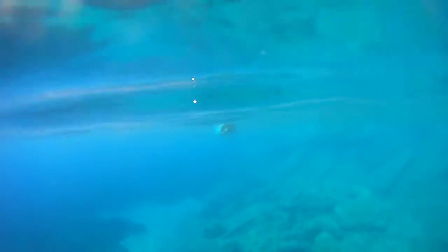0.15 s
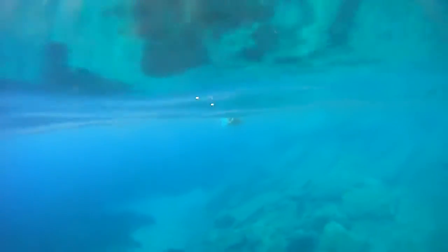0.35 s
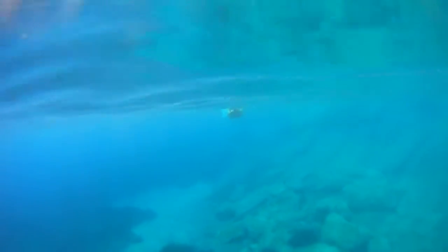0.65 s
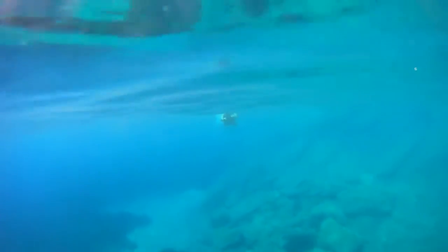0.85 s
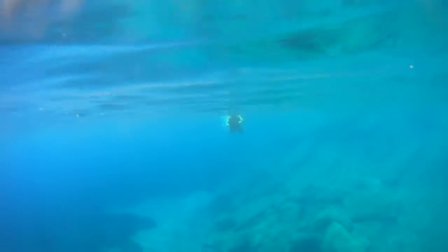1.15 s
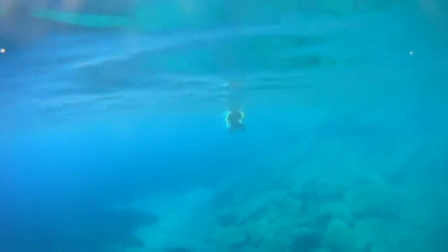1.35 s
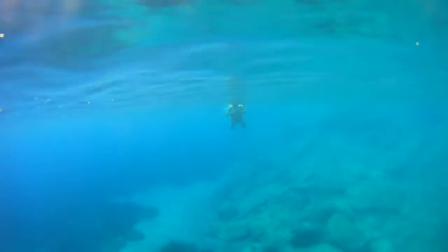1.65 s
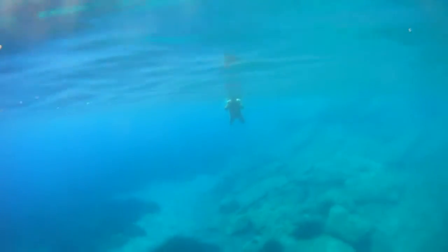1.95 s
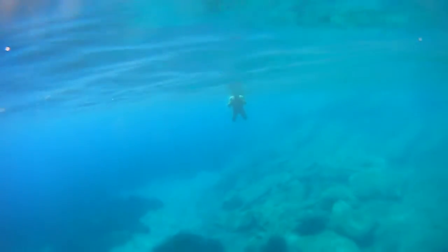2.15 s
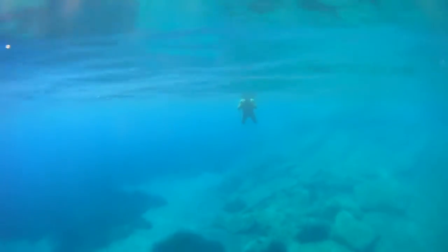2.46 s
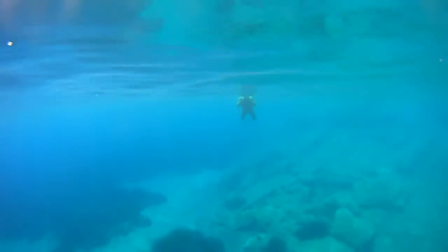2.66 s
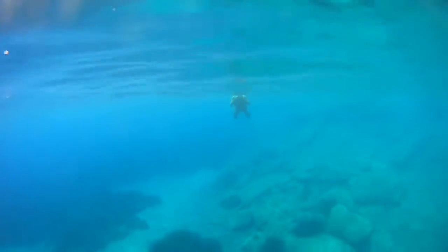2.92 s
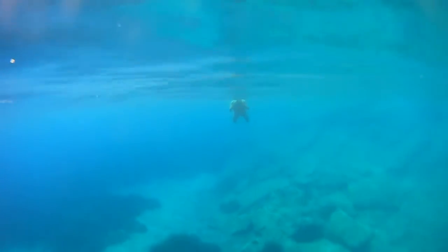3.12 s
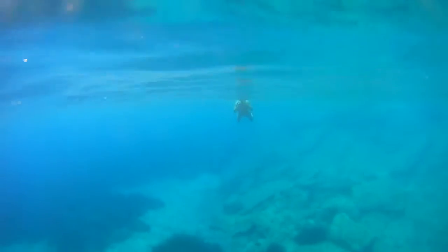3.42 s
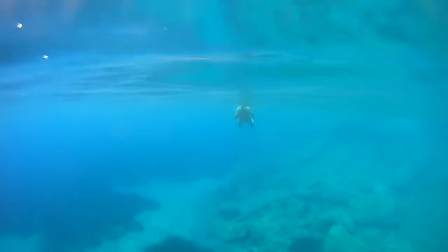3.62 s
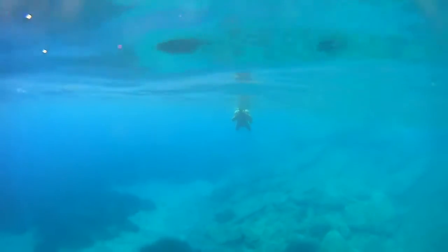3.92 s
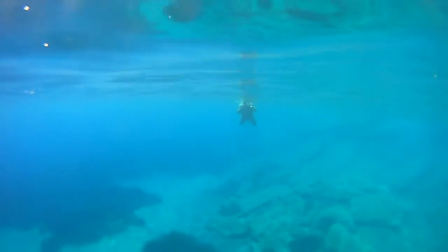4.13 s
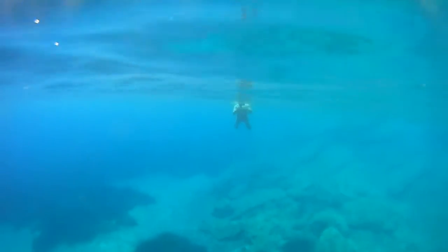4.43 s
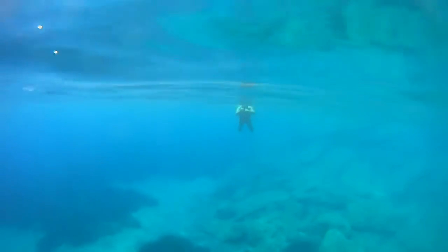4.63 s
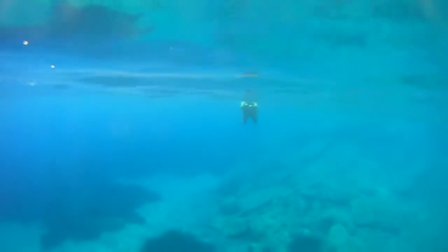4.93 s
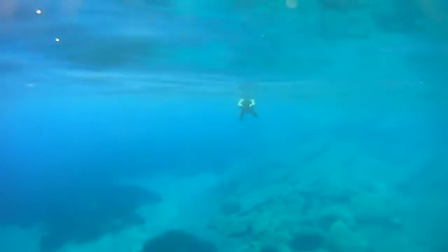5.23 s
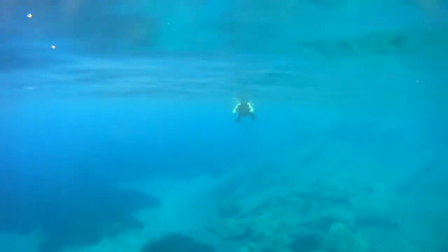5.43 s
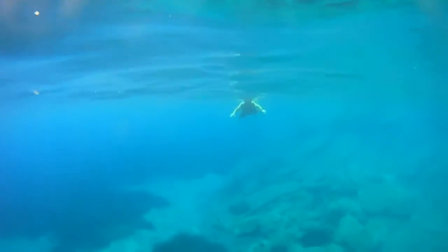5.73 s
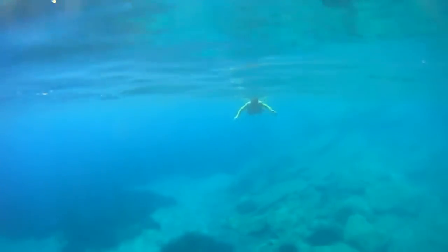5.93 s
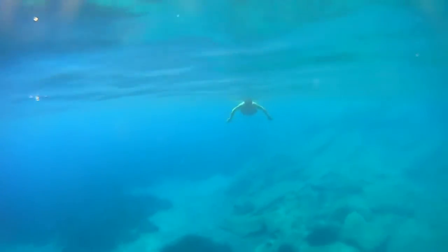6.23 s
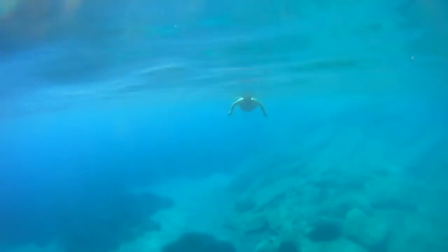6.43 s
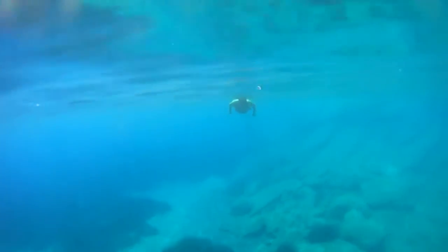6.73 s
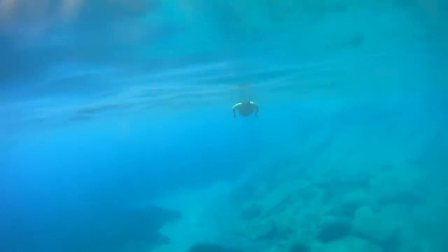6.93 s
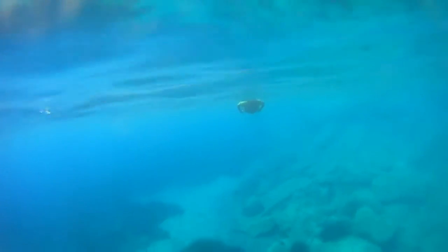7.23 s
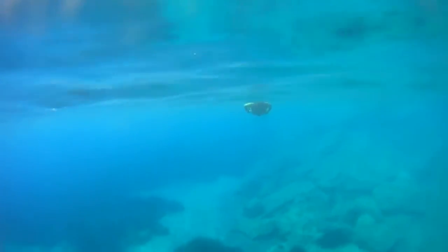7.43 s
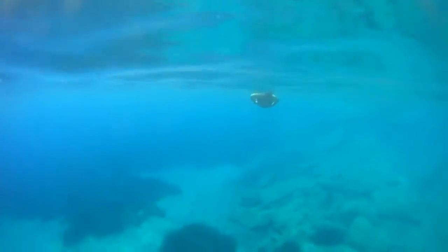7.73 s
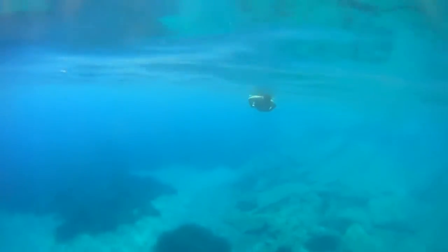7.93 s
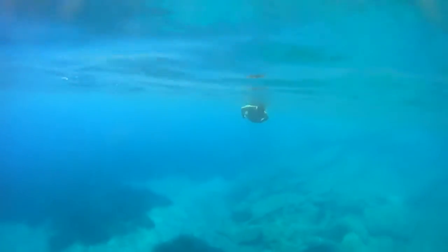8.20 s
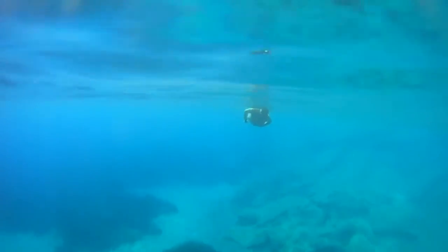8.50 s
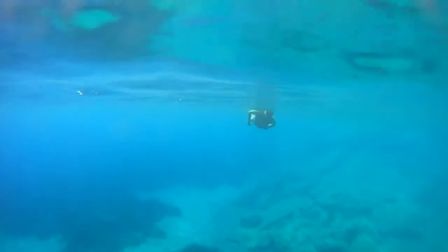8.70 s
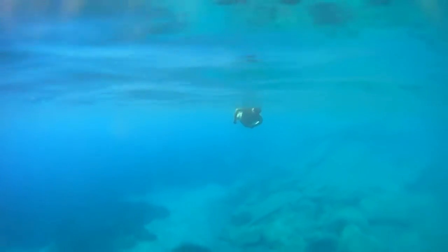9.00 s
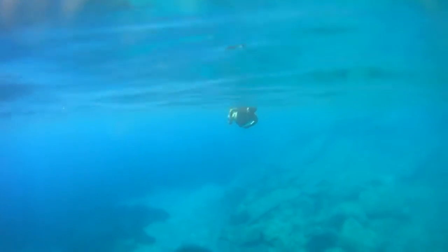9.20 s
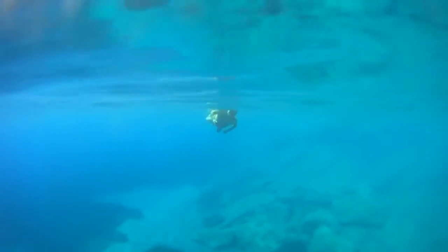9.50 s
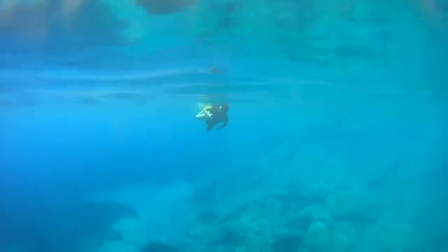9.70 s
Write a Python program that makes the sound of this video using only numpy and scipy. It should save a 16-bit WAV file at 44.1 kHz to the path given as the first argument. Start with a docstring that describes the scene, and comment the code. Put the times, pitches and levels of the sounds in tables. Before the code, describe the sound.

Underwater, a dense nonstop crackle of tiny sharp clicks, near and far, over faint watery wash and hum, with occasional bumps on the camera housing.

```python
"""Just under the sea's surface above a rocky shore floats a camera in a waterproof housing.
Snapping shrimp crackle near and far: each snap is a click and its random echoes, coloured by the housing.
The farthest blend into a sizzle of noise. Noise shaped in pitch and level makes the moving water:
a wash with a faint housing hum, sloshing wavelets, and one swish. Ticks and bumps ring the housing
as dying sine waves. A faint wide hiss lies underneath."""
import sys
import numpy as np
from scipy import signal
from scipy.fft import rfft, irfft
from scipy.io import wavfile

SR = 44100
rng = np.random.default_rng(int(sys.argv[2]) if len(sys.argv) > 2 else 0)


def output_pcm(signal):
    """Save a mono or channel-first signal as 16-bit PCM at the path in sys.argv[1].

    Samples are clipped to [-1, 1] before scaling.
    """
    pcm = np.clip(np.atleast_2d(signal).T, -1, 1) * 32767
    wavfile.write(sys.argv[1], SR, np.round(pcm).astype(np.int16))


N = 434826   # length in samples
ALL_HZ, TIME = np.arange(N // 2 + 1) * SR / N, np.arange(N) / SR
# a single snap or knock lasts this many samples
SIZE = 4096
SHORT_HZ, SHORT_TIME = np.arange(SIZE // 2 + 1) * SR / SIZE, np.arange(SIZE) / SR
# multiplying by this puts a sound in the two channels with opposite signs
OPPOSITE = np.array([[1], [-1]])


def from_db(db):
    """Turn decibels into a plain multiplier."""
    return 10 ** (np.asarray(db) / 20)


def rms_one(x):
    """Scale a sound to an average strength (rms) of 1."""
    return x / np.sqrt(np.mean(x ** 2) + 1e-20)


def level_curve(points):
    """Join (t/s, level/dB) points by straight lines, read at every sample."""
    s, db = np.transpose(points)
    return np.interp(TIME, s, db)


def at_hz(points, hz):
    """Read a (f/Hz, level/dB) spectrum, joining its points along a log-frequency axis."""
    f, db = np.transpose(points)
    return np.interp(np.log(hz + 1), np.log(f), db)


def noise(spectrum):
    """Steady noise of a given colour, rms 1: white noise with each frequency turned up or down."""
    white = rfft(rng.standard_normal(N))
    return rms_one(irfft(white * from_db(at_hz(spectrum, ALL_HZ)), N))


def wobble(length, step):
    """Smooth random ups and downs, about `step` points apart; spread near 1."""
    points = rng.standard_normal(length)
    return np.interp(np.arange(length) / step, np.arange(length), points) / np.sqrt(2 / 3)


def causal(db):
    """Minimum-phase response with these levels: nothing sounds before the blow."""
    cepstrum = irfft(np.log(from_db(db)))
    # fold the half that lies before time zero onto the half after it
    cepstrum[1:SIZE // 2] *= 2
    cepstrum[SIZE // 2 + 1:] = 0
    return np.exp(rfft(cepstrum))


def scatter(delay, t60, lumpy):
    """A spray of reflections of energy 1, dying by 60 dB in t60 seconds; when lumpy, a few stand out."""
    age = SHORT_TIME - delay
    unevenness = np.exp(lumpy * rng.standard_normal(SIZE))
    decay = (age > 0) * from_db(-60 * abs(age) / t60)
    paths = rng.standard_normal(SIZE) * unevenness * decay
    return paths / np.sqrt(np.sum(paths ** 2) + 1e-20)


def add(out, s, sound):
    """Mix a short stereo sound in at time s."""
    i = max(0, int(s * SR))
    out[:, i:i + SIZE] += sound[:, :max(0, N - i)]


def hiss():
    """Faint steady noise, opposite in the two channels so that it sounds wide."""
    # colour of the hiss: (f/Hz, relative level/dB)
    hiss_colour = [(30, -24), (150, -7.5), (500, -0.5), (1500, -4), (2500, -8), (4400, -11.5),
                   (6000, -13.5), (8000, -18.5), (11000, -19.5)]
    return from_db(-57.5) * noise(hiss_colour) * OPPOSITE


def sizzle():
    """The farthest shrimp: snaps too many to tell apart blend into a noise of slowly changing level."""
    # changing level, before a shared 8.5 dB cut: (t/s, level/dB)
    reef_level = [(0.0, -53), (1.95, -49), (3.16, -51), (9.67, -49.5), (9.86, -49.5)]
    # colour of the sizzle: (f/Hz, relative level/dB)
    sizzle_colour = [(1000, -16.5), (2200, -9), (3500, -11), (4400, -7.5), (5000, -0.5), (5400, -2.5),
                     (5900, -10.5), (6900, -14), (7700, -9), (9000, -12.5), (11000, -16)]
    return from_db(level_curve(reef_level) - 8.5) * noise(sizzle_colour)


def wash():
    """Moving water: even noise, plus the hum of the housing's main mode as noise in a narrow band."""
    # level shared by water noise and hum: (t/s, level/dB)
    wash_level = [(0.0, -61.5), (1.64, -57), (2.75, -57.5), (3.15, -60), (5.2, -60), (5.63, -57.5),
                  (7.22, -59.5), (9.36, -56.5), (9.86, -57.5)]
    # colour of the water noise: (f/Hz, relative level/dB)
    wash_colour = [(120, -13), (215, 3.5), (265, -7.5), (305, 2), (340, -4), (375, 2), (480, -5.5),
                   (640, -14), (820, -14), (1200, -15), (1550, -12), (2000, -24), (3000, -33), (6000, -56)]
    hum_hz, hum_width_hz, hum_db = 581, 23, -2.5
    band = [hum_hz - hum_width_hz / 2, hum_hz + hum_width_hz / 2]
    mode = signal.butter(1, band, "band", fs=SR)
    ringing = rms_one(signal.lfilter(*mode, rng.standard_normal(N)))
    hum = from_db(hum_db + 0.94 * wobble(N, step=5300)) * ringing
    return from_db(level_curve(wash_level)) * (from_db(-0.51) * noise(wash_colour) + hum)


def slosh():
    """Wavelets slosh against the housing: lumpy low noise that swells and ebbs with each one."""
    # wavelets: (crest t/s, level/dB, time to swell or ebb by a factor e/s)
    wavelets = [(1.01, -58.5, .08), (3.73, -62, .08), (4.12, -58.5, 0.029), (4.6, -66, .15),
                (5.0, -65, 0.17), (5.6, -67, 0.18), (6.3, -71, 0.47), (7.02, -55, 0.046),
                (7.5, -59.5, 0.13), (8.09, -62.5, .04), (8.94, -54, 0.16), (9.16, -62, 0.079),
                (9.46, -52.5, 0.041), (9.61, -57, 0.041)]
    # colour of the slosh: (f/Hz, relative level/dB)
    slosh_colour = [(20, -2), (50, -0.5), (90, -2.5), (145, 1.5), (200, -6), (320, -48), (700, -34)]
    calm_db, lumps_db = -72.5, 2.8   # level between wavelets (before a shared 4 dB boost), unevenness
    swells = [from_db(db) * np.exp(-abs(TIME - s) / length) for s, db, length in wavelets]
    level = np.sqrt(from_db(calm_db) ** 2 + np.sum(np.square(swells), axis=0))
    lumps = from_db(4.0 + lumps_db * wobble(N, step=1200))
    centre = noise(slosh_colour)
    sides = from_db(-19.5) * OPPOSITE * noise(slosh_colour)
    return level * lumps * (centre + sides)


def swish():
    """Water rushes along the housing, roughened by eddies: it builds, holds briefly and breaks off."""
    # colour of the swish: (f/Hz, relative level/dB)
    rush_colour = [(60, -2), (350, -9), (590, -3), (800, -11), (1040, 0.5), (1300, -14), (1540, 3),
                   (1650, -8), (1900, -5), (2500, -27), (3200, -7), (3500, -17), (4000, -11), (9000, -28)]
    end_s, hold_s, crest_db = 9.469, 0.014, -43.5
    rise_db_per_s, fall_db_per_s, eddies_db = 144, 750, 1.5
    age = TIME - end_s
    rise_db = rise_db_per_s * np.minimum(age + hold_s, 0)
    fall_db = -fall_db_per_s * age
    shape_db = np.minimum(rise_db, fall_db)
    level = from_db(crest_db + shape_db + eddies_db * wobble(N, step=150))
    centre = noise(rush_colour)
    sides = from_db(-1.5) * OPPOSITE * noise(rush_colour)
    return level * (centre + sides)


def knocks():
    """Contacts ring the housing: hard ticks reach its high modes, soft bumps only the low ones."""
    # contacts on the housing: (t/s, peak level/dB, lowest f/Hz of the push, highest f/Hz of the push)
    contacts = [(0.1448, -28, 1200, 7000), (0.1595, -8.5, 860, 10600), (0.175, -12, 460, 7500),
                (3.545, -42.5, 480, 640), (4.38, -42, 90, 190), (4.605, -45, 90, 190),
                (5.018, -42, 90, 190), (7.517, -41, 80, 413), (7.544, -33, 100, 756), (7.816, -38, 60, 184),
                (8.104, -41.5, 300, 596), (8.888, -39.5, 400, 710), (8.9412, -20.5, 200, 1160),
                (8.948, -21, 90, 250), (8.9632, -16, 169, 930), (8.996, -30, 199, 1070),
                (9.153, -40.5, 50, 160), (9.294, -43.5, 60, 200), (9.466, -39, 50, 200)]
    # the housing's modes: (f/Hz, relative level/dB, time to die by 60 dB/s)
    modes = [(91, -11, 0.082), (144, 1, 0.049), (195, 0.5, 0.081), (289, 1, 0.025), (602, -4.5, 0.11),
             (619, -3, 0.063), (724, -4, 0.029), (1082, -1.5, 0.053), (1190, -6, 0.04), (1430, -2, 0.018),
             (1560, 2.5, 0.017), (1740, -2, 0.024), (2340, -5.5, 0.014), (2970, -6, 0.02),
             (5240, 9.5, 0.014), (5600, -16, 0.013), (6240, 8.5, 0.011), (7800, 4, 0.0091),
             (8750, 17.5, 0.0071), (9360, 19, 0.0066), (9950, 17, 0.0073)]
    out = np.zeros((2, N))
    hz, db, t60 = np.transpose(modes)[:, :, None]
    rings = from_db(db - 60 * SHORT_TIME / t60) * np.exp(2j * np.pi * hz * SHORT_TIME)
    # the higher a mode, the further its phase differs between the two microphones
    radians = np.interp(hz[:, 0], [150, 1000, 9000], [.3, .55, .75])
    for s, peak_db, low_hz, high_hz in contacts:
        phases = OPPOSITE * radians * rng.choice([-1, 1], len(hz))
        strengths = from_db(rng.normal(0, 1, len(hz))) * np.exp(1j * phases)
        crack = from_db(11) * scatter(delay=0, t60=0.014, lumpy=0.46)
        # a soft push loses its treble, a brief push its bass
        soft = signal.butter(4, high_hz, "low", fs=SR, output="sos")
        brief = signal.butter(2, low_hz, "high", fs=SR, output="sos")
        sound = signal.sosfilt(np.vstack([soft, brief]), (strengths @ rings).imag + crack)
        add(out, s, from_db(peak_db) * sound / np.abs(sound.mean(axis=0)).max())
    return out


def snap(body_db, treble_db, echo_db):
    """One bubble collapse with its echoes, heard through the housing; stereo, peak near 1."""
    # a snap heard through the housing wall: (f/Hz, level/dB)
    wall_colour = [(200, -42), (1100, -35.5), (1550, -21), (2000, -28.5), (2250, -20), (2550, -31),
                   (2950, -13), (3400, -19.5), (4200, -2.5), (4900, 6), (5450, 3), (5800, -9.5), (6300, -7),
                   (6850, -15.5), (7200, -12), (7800, -9.5), (8700, -13.5), (9100, -20), (11000, -33)]
    first_ring_s, peak_over_rms = 0.0018, 2.404
    # how much of each frequency counts as body, and as treble
    body = np.interp(SHORT_HZ, [3300, 4700], [1, 0])
    treble = np.interp(SHORT_HZ, [5300, 7200], [0, 1])
    # each direction of arrival favours other parts of the wall's response
    angle_db = 2.42 * wobble(len(SHORT_HZ), step=45.73)
    wall_db = at_hz(wall_colour, SHORT_HZ) + body_db * body + treble_db * treble + angle_db
    wall = causal(wall_db)
    direct = scatter(delay=0, t60=0.012, lumpy=0.49) * 0.45
    direct[0] += 1   # the collapse itself, ahead of a brief spray from the rock beside it
    # rocks and the rippled surface return the snap late and duller
    gap = rng.uniform(0.0011, 0.0054)
    early = scatter(delay=gap, t60=0.045, lumpy=0.48)
    late = from_db(-12) * scatter(delay=0.012, t60=0.092, lumpy=0.88)
    echoes = from_db(echo_db + 3.1) * rfft(early + late) * from_db(-4 * treble)
    mid = wall * (rfft(direct) + echoes)
    # the air in the housing rings on differently at the two microphones
    air = rfft(scatter(delay=.0002, t60=0.0087, lumpy=0.22))
    side = mid * air * from_db(-12 + 10.7 * body + 5.9 * treble)
    pair = irfft(mid + OPPOSITE * side)
    first_ring = pair.mean(axis=0)[SHORT_TIME < first_ring_s]
    return pair / (peak_over_rms * np.std(first_ring))


def colony(per_s, loudest_db, range_db, count=120):
    """Weaker snaps at random times, from `count` voices in turn; the farther off, the more there are."""
    out = np.zeros((2, N))
    characters = rng.standard_normal((count, 3))
    voices = [snap(2 + 3 * a, 4 + 5.9 * b, -7 + 5 * c) for a, b, c in characters]
    for k, (when, far) in enumerate(rng.random((int(per_s * N / SR), 2))):
        level_db = loudest_db - range_db * np.sqrt(far)
        add(out, when * N / SR, from_db(level_db) * voices[k % count])
    return out


def near_shrimp():
    """The nearest shrimp: single bubble collapses that stand out, each with its own tone and echoes."""
    # snaps, before shared boosts of 1.4 dB to the level and 3.1 dB to the echoes:
    # (t/s, level/dB, extra body/dB, extra treble/dB, echoes against the direct snap/dB)
    near_snaps = [(0.3956, -34.5, 2, -5, -3), (0.4651, -26.5, 5, -18, -2), (0.472, -23, 0, -6, -11),
                  (0.4748, -20.5, 1, -12, -11), (0.526, -30, -8, 4, -3), (0.5695, -17.5, -6, 1.5, -12),
                  (0.8046, -25.5, -6, 3, -3.5), (1.1348, -32.5, 9, 11, -3.5), (1.3493, -25.5, -8, 14, -8),
                  (1.4774, -8, 2, -0.5, -7.5), (1.5099, -25, 1, 8, -7), (1.577, -28, 0, 4, -7),
                  (1.6744, -25, -5, 2, -16), (1.7058, -21.5, 3.5, -6, -1), (1.778, -19, 0, -3, -27),
                  (1.8344, -17, 3, -7, -3), (1.8429, -19, 1.5, 2, -2.5), (1.87, -29, 0, 12, -24),
                  (1.8964, -25, -8, 8, -26), (1.9474, -32, -6, 6, -12), (2.0004, -21, 5, 3.5, -14),
                  (2.132, -8, 3, -3.5, -14), (2.1821, -30, -3, 14, -23), (2.3038, -17.5, 4.5, -0.5, -11),
                  (2.4418, -18.5, 13.5, -3, -4), (2.5385, -29, 3, 3, -8), (2.5962, -27, 4, 6, -2.5),
                  (2.633, -30.5, 1, 21, -16), (2.7214, -28.5, 11.5, -5, 0.5), (3.0485, -33.5, 0, 13, -20),
                  (3.1473, -29.5, 6, -11, -4.5), (3.1814, -29.5, -16, -5, -4),
                  (3.2184, -26.5, -13, -4, -16), (3.341, -19, -14, 3, -16), (3.5127, -19.5, -7, -3, -7),
                  (3.8034, -36.5, 8, 12, -3), (4.1789, -16, 1, 4.5, -10.5), (4.2674, -32, -1, 9, 3),
                  (4.3289, -29.5, 3.5, 2, 2.5), (4.385, -19.5, -4, -6, -8), (4.407, -32.5, 10, 16, -9),
                  (4.6474, -30, -3, 13, -5), (4.709, -15, 0.5, -2, -5), (4.758, -16, -6, -2, -13),
                  (4.8258, -34, -5, 22, -19), (4.9036, -27, 2, 6.5, -4), (5.011, -35, 19, 9, 0.5),
                  (5.1197, -32, -2, -20, -16), (5.3204, -33.5, 7, 11, 3), (5.4319, -27, -2, 0, -2),
                  (5.4976, -24.5, -5, -12, -6), (5.5958, -29.5, 1.5, 3.5, -1), (5.6853, -28, 1, 3, -17),
                  (5.8264, -26.5, 9.5, -8, 2), (6.0418, -20.5, 7, 5.5, -7), (6.2484, -28, 6, -8, -2),
                  (6.292, -28.5, -18, 2, -25), (6.44, -29, 4.5, 2, -0.5), (6.4552, -29.5, -10, 11, -15),
                  (6.4781, -31, 15, 3, -4), (6.6138, -23.5, -8, -2, -8.5), (6.739, -24.5, 2.5, 1, -2.5),
                  (6.7906, -28.5, 5, -8, -6), (6.833, -32.5, 7.5, -2, -6), (7.164, -31.5, 3, 3, -1.5),
                  (7.3072, -25.5, -14, -7, -6), (7.3805, -29.5, 2, 0, -5), (7.4314, -28, 3, -6, -0.5),
                  (7.812, -30.5, 0, 5, 3.5), (7.9308, -22.5, 12, 2, -2), (8.003, -30.5, 3, 9, -7.5),
                  (8.258, -26, -4, -1, -10), (8.3124, -22.5, 1, -1.5, -3.5), (8.48, -22, 5.5, 5.5, -5),
                  (8.5608, -33.5, 4, 21, -16), (8.6345, -16, 1.5, 4, -19), (8.75, -17.5, 6, 9, -6),
                  (8.785, -18, 1, 5, -8), (8.831, -20, 2, 9.5, -17), (9.0064, -21.5, -5, -0.5, 1.5),
                  (9.012, -19, 1.5, -19, -25), (9.0588, -20.5, 6, 2, -6), (9.1256, -17.5, -2, 2, -10),
                  (9.1293, -18, -1, -15, -15), (9.1546, -31, 1, 11, -1), (9.3389, -24, -6, 11, -3),
                  (9.5374, -32.5, 4, -2, -13), (9.5746, -27.5, 12.5, 15.5, -3), (9.6615, -12.5, -1, 3, -22),
                  (9.6661, -18, 2, 1, -3.5)]
    out = np.zeros((2, N))
    for s, level_db, body_db, treble_db, echo_db in near_snaps:
        add(out, s, from_db(level_db + 1.4) * snap(body_db, treble_db, echo_db))
    return out


def scene():
    """Add up the hiss, the water, the housing and the shrimp from far to near."""
    # the shrimp in between: (snaps per second/Hz, loudest level/dB, drop to the faintest/dB)
    crowds = [(5, -32.5, 3.5), (126.3, -32, 23.5)]
    water = wash() + slosh() + swish()
    shrimp = sizzle() + sum(colony(*row) for row in crowds) + near_shrimp()
    # the second channel is slightly louder than the first
    return (hiss() + water + knocks() + shrimp) * from_db(-.15 * OPPOSITE)


def record(dry):
    """Cut the top steeply above 11100 Hz with an elliptic low-pass filter."""
    steep = signal.ellip(10, .2, 65, 11100, fs=SR, output="sos")   # ripple .2 dB, cut 65 dB
    return signal.sosfilt(steep, dry)


dry = scene()
out = record(dry)
output_pcm(out)
```